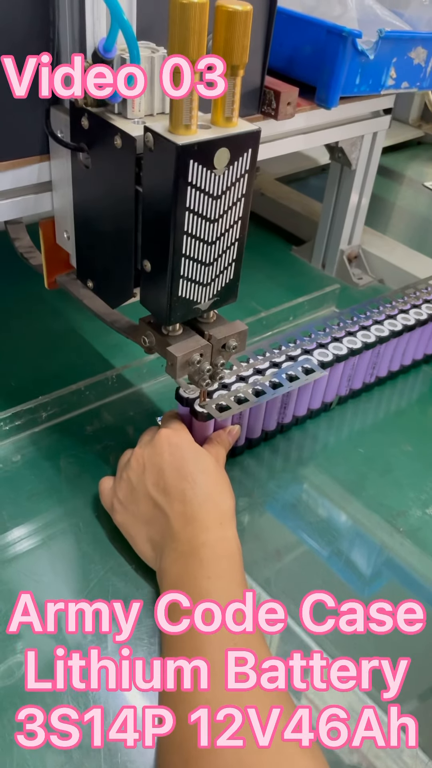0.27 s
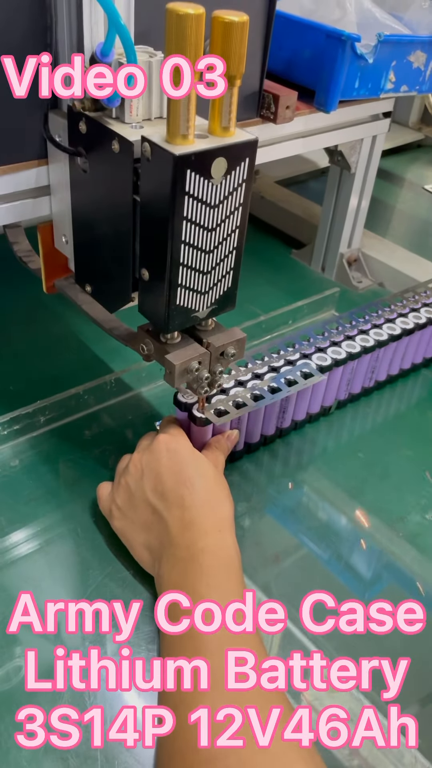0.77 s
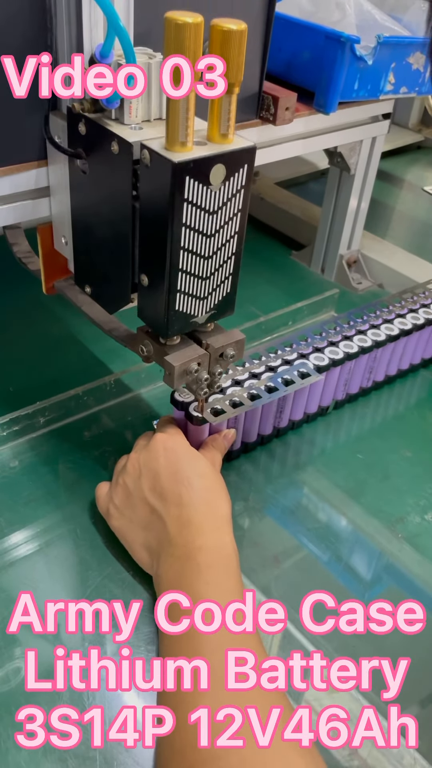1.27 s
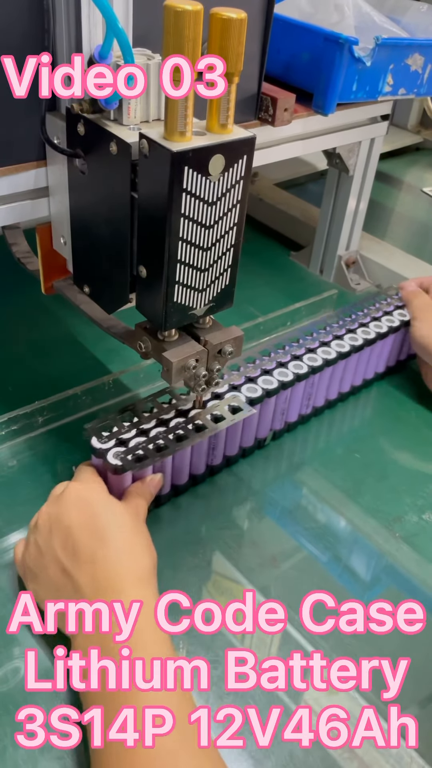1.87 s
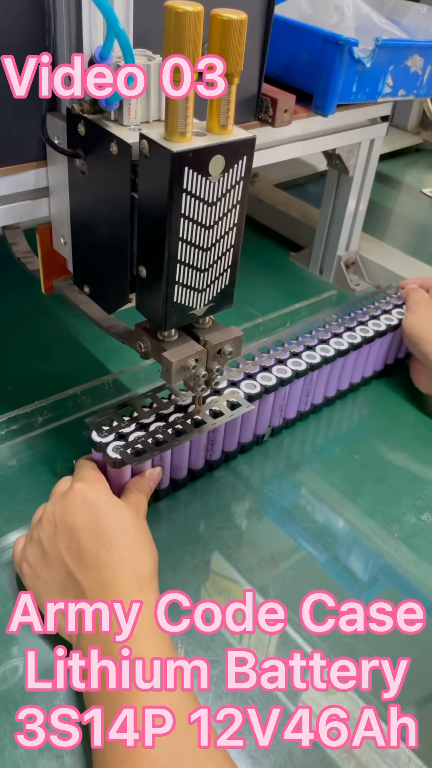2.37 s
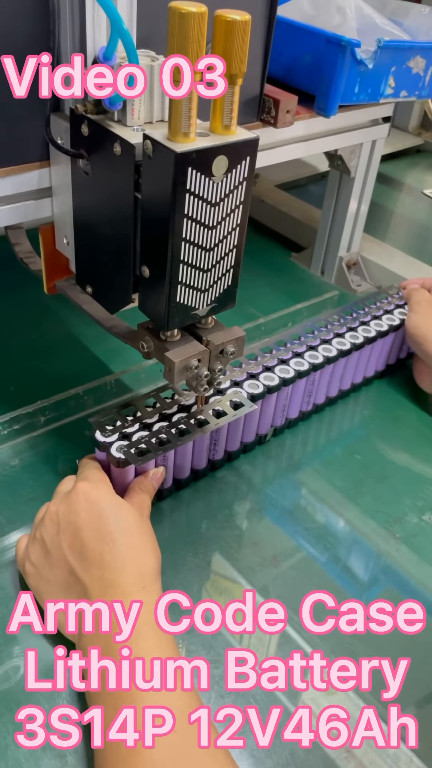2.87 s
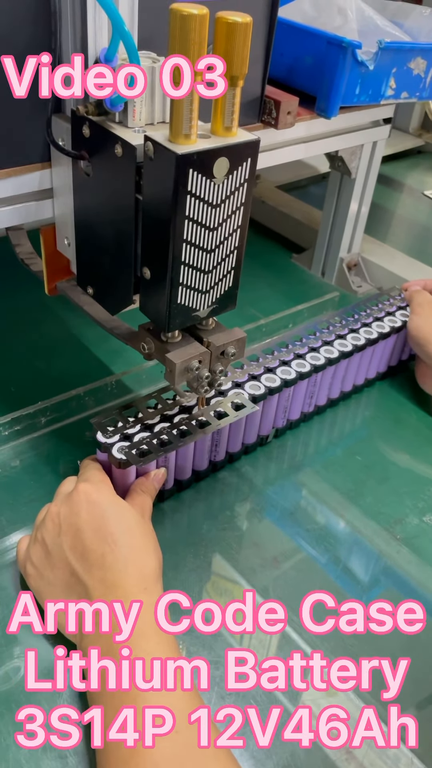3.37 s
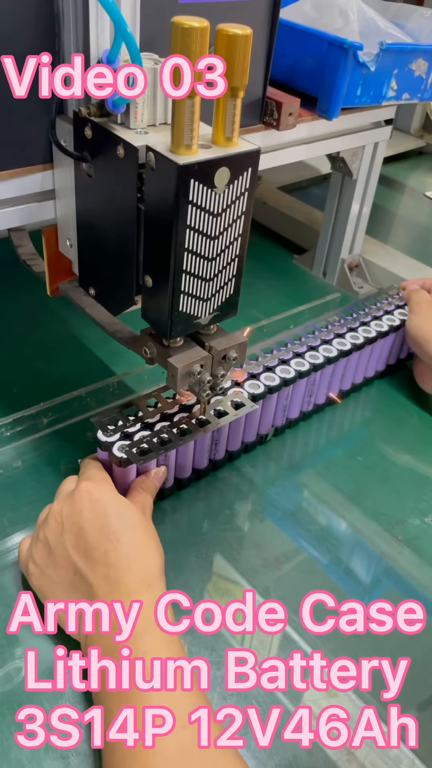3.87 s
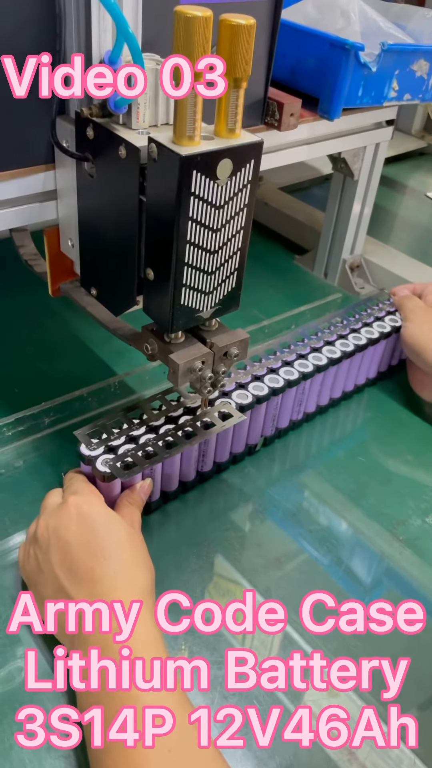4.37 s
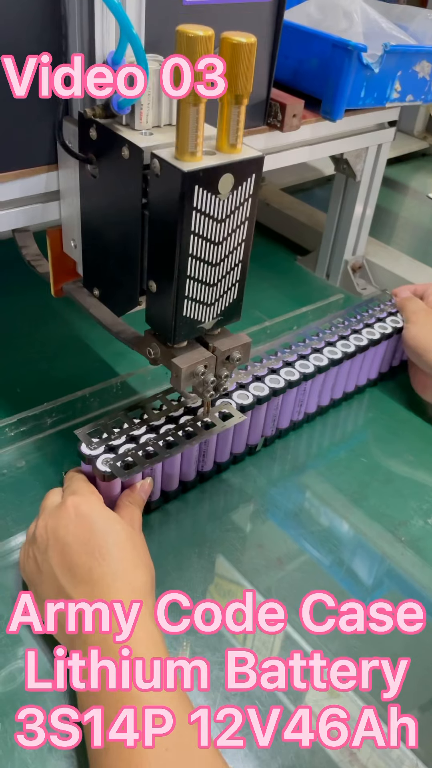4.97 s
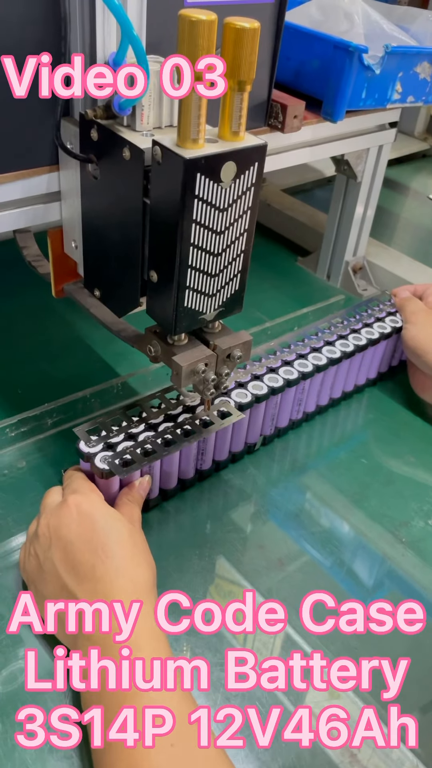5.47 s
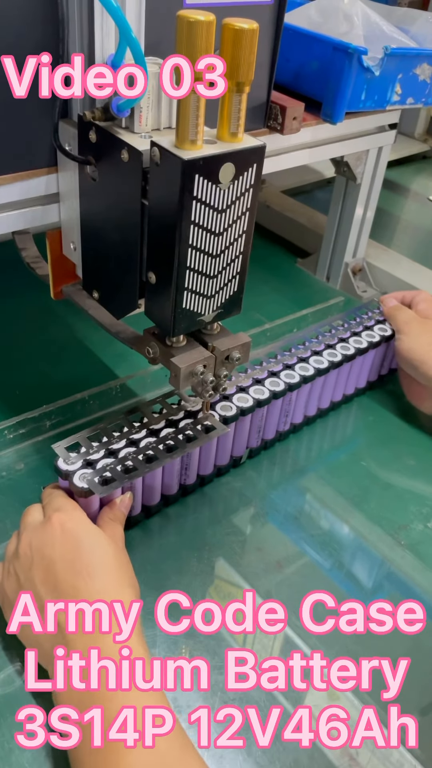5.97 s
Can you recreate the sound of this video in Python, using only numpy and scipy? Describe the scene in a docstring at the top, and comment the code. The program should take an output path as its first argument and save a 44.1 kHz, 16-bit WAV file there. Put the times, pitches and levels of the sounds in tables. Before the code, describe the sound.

Three pairs of sharp air spits and metal clacks come from a close spot welder, with machines humming behind.

```python
"""A workshop bench: a pneumatic spot welder works close to a phone. Each weld is one cycle: the valve
spits air, the head slams onto the cells, the valve vents, the piston clacks home and the frame shudders.
Air is fluttering noise; blows are chattering contacts that ring metal modes. Between welds the pack
of cells slides and bumps along the bench; machines drone and air lines hiss behind."""
import sys
import numpy as np
from scipy import signal
from scipy.fft import rfft, irfft, next_fast_len
from scipy.io import wavfile
from scipy.ndimage import uniform_filter1d

SR = 44100
rng = np.random.default_rng(int(sys.argv[2]) if len(sys.argv) > 2 else 0)


def unload_audio(sound):
    """Save the sound as a 16-bit wav file, at the path given as the first command line argument."""
    columns = np.transpose(np.atleast_2d(sound))
    # keep every value between -1 and 1, then stretch to whole-number steps
    steps = np.round(np.clip(columns, -1, 1) * 32767)
    wavfile.write(sys.argv[1], SR, steps.astype(np.int16))


N = 274743

# valve opens to drive the head down: t/s, air/dB, burst t60/s, knock/dB
FEEDS = [(0.5014, -7, 0.033, -14.5), (1.1217, -8, 0.042, -17), (2.974, -7.5, 0.041, -15.5),
         (3.615, -8, 0.038, -15.5), (4.796, -8.5, 0.037, -15.5), (5.3956, -9, 0.05, -15.5)]
# piston hits the end cap: t/s, level/dB
CLACKS = [(0.72, -16.5), (1.347, -18), (3.206, -15), (3.849, -19), (5.019, -16.5), (5.606, -17)]
# head rebounds, frame shudders: t/s, level/dB, treble/dB, shudder t/s, shudder level/dB
REBOUNDS = [(.768, -19, -4, .797, -10), (1.401, -19.5, 1, 1.415, -8), (3.259, -18, 1, 3.281, -11.5),
            (3.900, -20.5, 0, 3.916, -12), (5.069, -19.5, 1.5, 5.095, -6), (5.659, -20, 1, 5.689, -8.5)]
# welder frame: f/Hz, level/dB, t60/s
FRAME_MODES = [(62, -18, 0.067), (77.7, -4, 0.098), (118.9, 0, 0.049), (142.2, -10, 0.059),
               (148.4, -2, 0.068), (207.6, -5, 0.084), (246.1, -5.5, 0.11), (266.7, -8, 0.12),
               (309.6, -10, 0.067), (381.6, -5.5, 0.031), (518.6, -1.5, 0.036), (607, -6.5, 0.026),
               (659, -14.5, 0.059), (826, -16.5, 0.036), (978, -12, 0.035), (1107, -7.5, 0.031),
               (1428, -7.5, 0.016), (1483, -21.5, 0.069), (1616, -7.5, 0.017), (1823, -12.5, 0.027),
               (2030, -19, 0.023), (2200, -26, 0.027), (2313, -14.5, 0.021), (2780, -9.5, 0.015),
               (2990, -10.5, 0.012), (3260, -18, 0.019), (3870, -11, .009)]
# coupling of clacks and ticks to their modes: f/Hz, gain/dB
CAP_REACH = [(990, -1), (1600, -5.5), (2400, -1), (3400, -4), (4700, 2)]


def valve_air():
    """Air spits as the valve feeds and vents and the piston lands; faint spits of treble between welds."""
    vents = [(0.644, -21.5, 0.012, -11), (1.2676, -17, 0.011, -18), (3.128, -19, 0.019, -16.5),
             (3.765, -18.5, 0.015, -18), (4.94, -20.5, 0.016, -14), (5.529, -23, 0.0077, -10)]  # exhaust: t/s, level/dB, rise/s, hiss re burst/dB
    spits = [(0.871, -39, -17), (1.589, -42.5, -6), (2.0598, -37.5, -35), (2.1403, -32, -18.5),
             (2.1944, -42, -16), (3.961, -47.5, 0.5), (4.3014, -54, 1.5), (5.7538, -43, -10.5)]  # faint spits of treble: t/s, level/dB, hiss re burst/dB
    feed = jet([(s, db, 0.0025, t60, -20) for s, db, t60, _ in FEEDS])
    cylinder_fill = jet([(s, db - 13.5, 0.0025, 0.1, -30) for s, db, *_ in FEEDS])
    vent = jet([(s, db, rise, 0.09, hiss_db) for s, db, rise, hiss_db in vents])
    treble_spits = jet([(s, db, 0.002, 0.03, hiss_db) for s, db, hiss_db in spits])
    squeezed_out = jet([(s, db - 14, 0.002, 0.035, -30) for s, db in CLACKS])
    return feed + cylinder_fill + vent + treble_spits + squeezed_out


def jet(events):
    """A jet snaps open, collapses fast and leaves a thin hiss; turbulence makes it flutter."""
    burst_spectrum = [(300, -32), (1200, -0.5), (2000, -4), (2600, 2.5), (3300, -11), (4200, -1.5),
                      (5300, 3.5), (6300, 4.5), (7500, 5), (9800, -3), (11500, -1.5), (13500, -6),
                      (15300, -4.5), (16500, -7)]  # open jet: f/Hz, density/dB
    hiss_spectrum = [(600, -3), (1500, 0.5), (2600, -0.5), (4200, -3.5), (5200, 4), (6000, 1.5),
                     (8500, -5.5), (10500, -5), (12600, -10.5), (13600, -11), (15500, -21), (16500, -32)]  # lingering hiss: f/Hz, density/dB
    hiss_t60_s = 0.42
    burst, hiss, t = np.zeros(N), np.zeros(N), np.arange(SR) / SR
    snap = 0.54 * np.exp(-t / 0.00067)
    for s, db, rise_s, t60_s, hiss_db in events:
        opening = undb(db) * (1 - np.exp(-t / rise_s))
        add(burst, s, opening * (undb(-60 * t / t60_s) + snap))
        add(hiss, s, opening * undb(hiss_db - 60 * t / hiss_t60_s))
    flutter = undb(2.0 * walk(300) + 2.2 * walk(45))
    return flutter * (burst * noise(burst_spectrum) + hiss * noise(hiss_spectrum))


def head_slams():
    """The head lands on the cells and rings the frame."""
    slams = [(.568, -20, 12, 9.5), (1.182, -20.5, 13, 6), (3.043, -20.5, 10, 9.5), (3.673, -20, 10, 14.5),
             (4.859, -21.5, 12, 13), (5.455, -22, 15, 16.5)]  # landings: t/s, level/dB, bass/dB, middle/dB
    reach = [(61, -8), (80, -3.5), (116, -2.5), (137, 8), (153, 2), (208, 1.5), (250, 0.5), (400, 1),
             (510, 3), (610, -1), (1100, 3), (1390, -2.5), (1470, 11.5), (1610, -1), (3000, 3.5), (3800, 1)]  # coupling to the frame: f/Hz, gain/dB
    hits = [blow(*slam, treble_db=5.5, rattle_s=0.0086) for slam in slams]
    return struck(hits, FRAME_MODES, reach, scatter_db=2.5, lag_s=0.0418, first_hz=772,
                  rise_s=0.00045, detune=0.022, push=10)


def head_release():
    """The head lets go in a few jerks, each ringing the frame."""
    jerks = [(.654, -16.5, -2, 0), (.660, -15, 0, -1.5), (.673, -16.5, 0, 0), (.682, -21, 5, 2),
             (1.277, -16.5, 10.5, 4), (1.286, -16, -9, -1), (1.303, -25.5, 4, 2), (3.138, -17, 5, 0.5),
             (3.145, -13, -6, -2), (3.158, -23.5, 1, 1.5), (3.769, -13.5, 0, 4), (3.776, -13, 2, -3),
             (3.784, -14.5, -5, -2), (4.952, -19, -3, 3), (4.958, -13.5, -6, 0), (4.973, -18, 5, -2),
             (4.981, -20, 1, -4), (5.540, -15.5, -5, -1), (5.545, -11, 0, -4), (5.555, -22, -3, -4),
             (5.566, -21, 7, 3)]  # release: t/s, level/dB, middle/dB, treble/dB
    reach = [(61, 1), (116, 6), (150, -12), (208, 5.5), (250, -2.5), (400, -2), (510, -4.5), (700, 4),
             (1100, 5.5), (1470, 2.5), (2000, 9), (3000, 6.5), (3800, 13)]  # coupling to the frame: f/Hz, gain/dB
    hits = [blow(s, db, -6.5, middle, treble, rattle_s=0.0049) for s, db, middle, treble in jerks]
    return struck(hits, FRAME_MODES, reach, scatter_db=2.5, lag_s=0.0032, first_hz=2500,
                  rise_s=0.0029, detune=0.021, push=9.8)


def frame_shudder():
    """A long, low chatter of the frame after each rebound."""
    reach = [(61, -24), (80, -27), (120, -11), (153, -4), (208, -8), (250, -1.5), (316, -9), (600, -19),
             (2200, -34)]  # coupling to the frame: f/Hz, gain/dB
    hits = [blow(s, db, rattle_s=0.02) for *_, s, db in REBOUNDS]
    return struck(hits, FRAME_MODES, reach, scatter_db=1, lag_s=0.0055, first_hz=2980,
                  rise_s=0.0049, detune=0.0078, push=2.3)


def piston_clacks():
    """The returning piston rings the end cap."""
    cap_modes = [(998, -0.5, 0.042), (1185, -12, 0.076), (1244, 3, 0.0041), (1446, 7, 0.024),
                 (1515, 7, 0.023), (1598, 4.5, 0.016), (1750, -3, 0.029), (2010, -2, 0.008),
                 (2260, -14, 0.0091), (2417, -3.5, 0.03), (2690, -0.5, 0.01), (2966, 1.5, 0.021),
                 (3128, 7.5, 0.0086), (3430, 2, 0.019), (4500, -5, 0.0079)]  # end cap: f/Hz, level/dB, t60/s
    hits = [blow(s, db, rattle_s=0.0046) for s, db in CLACKS]
    return struck(hits, cap_modes, CAP_REACH, scatter_db=1.5, lag_s=0.109, first_hz=2405,
                  rise_s=0.00078, detune=0.019, push=22, high_lag=1.6)


def cylinder_chirps():
    """Each clack runs through the cylinder, treble first: a short ring falling in pitch."""
    from_hz, to_hz, glide_s, peak_s = 2667, 1140, 0.00291, 0.0027
    out, t = np.zeros(N), np.arange(2000) / SR
    hz = to_hz + (from_hz - to_hz) * np.exp(-t / glide_s)
    envelope = (t / peak_s * np.exp(1 - t / peak_s)) ** 2
    ring = envelope * np.sin(2 * np.pi * np.cumsum(hz) / SR)
    for s, db in CLACKS:
        add(out, s, undb(db + 1) * ring)
    return out


def light_knocks():
    """Valve knocks, spool ticks, piston bounces, head rebounds and bench bumps ring the frame."""
    bumps = [(1.094, -34, 2, 4), (1.649, -25, 5, -13), (1.713, -28, 1, -3), (2.168, -23, -8, -13),
             (2.195, -24.5, -19, -4), (2.400, -34.5, 16, -11), (2.415, -31.5, 14, -8), (3.398, -31, 3, -27),
             (5.280, -26, -12, 2)]  # on the bench between welds: t/s, level/dB, bass/dB, middle/dB
    reach = [(60, -0.5), (250, 0), (1000, 1.5), (2300, -5.5), (3000, -0.5), (3760, -5)]  # coupling to the frame: f/Hz, gain/dB
    knocks = [blow(s + 0.00602, db, -7, -0.5, -45) for s, *_, db in FEEDS]
    ticks = [blow(s + 0.016, -31.5, -4, 3.5, 21) for s, *_ in FEEDS]
    bounces = [blow(s + 0.016, db - 5, -0.5, 2, -1.5) for s, db in CLACKS]
    rebounds = [blow(s + after_s, db + contact_db, -6, 2, treble, rattle_s=0.005)
                for s, db, treble, *_ in REBOUNDS for after_s, contact_db in ((0, -3), (0.013, -4))]
    bench = [blow(*bump, treble_db=-1.5, rattle_s=0.0075) for bump in bumps]
    hits = knocks + ticks + bounces + rebounds + bench
    return struck(hits, FRAME_MODES, reach, scatter_db=0.5, lag_s=0.0079, first_hz=3070,
                  rise_s=0.00086, detune=0.025, push=9.4)


def valve_spool():
    """The spool rings the valve body as it opens and again as it seats."""
    body_modes = [(2583, 1, 0.05), (3720, -3.5, 0.045), (4920, -11, 0.036), (5160, -9, .05),
                  (5800, -2, 0.042), (6370, -18, 0.036)]  # valve body: f/Hz, level/dB, t60/s
    reach = [(2600, 0.46), (5000, -0.62), (10000, -2)]  # f/Hz, gain/dB
    hits = [blow(s + after_s, db - 15.5, treble_db=treble, rattle_s=0.006)
            for s, db, *_ in FEEDS for after_s, treble in ((0, 0), (0.016, -5))]
    return struck(hits, body_modes, reach, scatter_db=4, rise_s=0.0008, detune=0.013, push=6.7)


def loose_metal():
    """Loose metal in the head ticks brightly."""
    ticks = [(0.686, -26), (.769, -31), (.783, -25), (1.096, -35), (1.400, -26), (3.270, -22), (5.070, -27),
             (5.082, -25), (5.657, -30), (5.671, -19.5)]  # contacts: t/s, level/dB
    modes = [(2820, -16, 0.011), (3180, -3, 0.014), (1500, -1, .012)]  # loose parts: f/Hz, level/dB, t60/s
    hits = [blow(s, db) for s, db in ticks]
    return struck(hits, modes, CAP_REACH, scatter_db=0.5, rise_s=0.0005, detune=0.014, push=6.7)


def blow(s, db, bass_db=0, middle_db=0, treble_db=0, rattle_s=0.001):
    """One hit for struck(): time, level, tone curve and chatter decay."""
    return s, db, [(120, bass_db), (230, 0), (600, middle_db), (2200, treble_db)], rattle_s


def struck(hits, modes, reach, scatter_db, rise_s, detune, push, lag_s=0, first_hz=3000, high_lag=0):
    """Chattering contacts ring the modes; those below first_hz lag, those above too if high_lag."""
    out, t = np.zeros(N), np.arange(12000) / SR
    hz, mode_db, t60_s = np.array(modes, float).T[:, :, None]
    log_distance = np.maximum(np.log(first_hz / hz), high_lag * np.log(hz / first_hz))
    delay_s = lag_s * (log_distance / 4.12) ** 2.1  # lag_s about six octaves down
    age_s = np.maximum(t - delay_s, 0)
    envelope = (1 - np.exp(-age_s / rise_s)) * undb(-60 * age_s / t60_s)
    for s, db, tone, rattle_s in hits:
        level_draw, pitch_draw = rng.standard_normal((2, len(modes), 1))
        rings = envelope * np.sin(2 * np.pi * hz * (1 + detune * pitch_draw) * age_s)
        chatter = rng.standard_normal((len(modes), 2048)) ** 3 * np.exp(-t[:2048] / rattle_s)
        chatter[:, :1] += push + 3000 / hz  # slow modes feel mostly the first push
        rung = signal.fftconvolve(rings, chatter, axes=1)
        rung *= np.sqrt(np.sum(rings ** 2, axis=1) / np.sum(rung ** 2, axis=1))[:, None]  # same energy
        gain = undb(mode_db + at_hz(reach, hz) + scatter_db * level_draw + at_hz(tone, hz))
        add(out, s, undb(db) * np.sum(gain * rung, axis=0))
    return out


def pack_scrapes():
    """The pack rubs unevenly on the bench, fading in and out."""
    slides = [(3.967, 0.091, -43.5), (4.044, 0.092, -45.5), (4.299, 0.13, -50.5)]  # pack moves: t/s, length/s, level/dB
    spectrum = [(800, -25), (1500, -7), (2000, -5), (2700, -9.5), (4000, -15), (9000, -25), (12000, -70)]  # friction: f/Hz, density/dB
    t = np.arange(N) / SR
    drag = sum(undb(db) * np.interp(t, s + length_s * np.array([0, 0.13, 0.68, 1]), [0, 1, 1, 0])
               for s, length_s, db in slides)
    return drag * undb(4.1 * walk(60)) * noise(spectrum)


def thin_hiss():
    """Very high hisses between welds start at once and fade."""
    hisses = [(.871, -52, 0.46), (1.59, -56, 0.74), (2.194, -47, .35)]  # onsets: t/s, level/dB, t60/s
    spectrum = [(11000, -28), (13500, -6), (14600, 0), (15600, 2), (16500, -10)]  # hiss: f/Hz, density/dB
    envelope, t = np.zeros(N), np.arange(SR) / SR
    for s, db, t60_s in hisses:
        add(envelope, s, undb(db - 60 * t / t60_s))
    return envelope * noise(spectrum)


def workshop():
    """Machines drone and air lines hiss; the bench booms and the hiss swells with each weld."""
    levels = [(0.0, -33, -45.5), (0.54, -34.5, -44.5), (1.16, -34, -44.5), (1.47, -31.5, -43.5),
              (1.82, -35, -45.5), (2.33, -31, -46), (2.64, -34.5, -45), (2.98, -33.5, -44),
              (3.64, -34, -44), (4.09, -32.5, -43.5), (4.44, -35.5, -45), (4.72, -34.5, -45.5),
              (5.36, -31.5, -44), (6.23, -34.5, -46.5)]  # background: t/s, rumble/dB, hiss/dB
    shake_spectrum = [(30, -27), (60, -9), (120, 7), (170, -8.5), (240, 2.5), (350, -9.5), (600, -13),
                      (1000, -16.5), (1600, -39), (4000, -92)]  # bench: f/Hz, density/dB
    rumble_spectrum = [(25, 1.5), (40, 4), (58, 6.5), (110, 0.5), (160, -3.5), (230, 1.5), (330, -8.5),
                       (520, -13), (750, -19), (1000, -17), (1500, -51), (2500, -51.5)]  # machines: f/Hz, density/dB
    hiss_spectrum = [(600, 10), (1200, 5.5), (2000, 2.5), (3000, -0.5), (4500, -8.5), (7000, -12.5),
                     (10000, -19.5), (12600, -27), (13600, -70), (16400, -90)]  # air lines: f/Hz, density/dB
    s, rumble_db, hiss_db = np.transpose(levels)
    t = np.arange(N) / SR
    shake = undb(-29.5) * swell(t, build_s=0.3, fade_s=0.19) * noise(shake_spectrum)
    rattle_db = 4 * swell(t, build_s=0.24, fade_s=0.12)
    rumble = undb(np.interp(t, s, rumble_db) + 2.1 * walk(15)) * noise(rumble_spectrum)
    hiss = undb(np.interp(t, s, hiss_db) + rattle_db) * noise(hiss_spectrum)
    return rumble + shake + hiss


def room(x):
    """Diffuse echo, duller than the direct sound."""
    t60_s, echo_db, cutoff_hz = 0.26, -23, 3080
    t = np.arange(SR) / SR
    tail = rng.standard_normal(SR) * undb(-60 * t / t60_s) * (1 - np.exp(-t / 0.00089))
    tail = signal.lfilter(*signal.butter(1, cutoff_hz, fs=SR), tail)
    return undb(echo_db) * signal.fftconvolve(x, tail / np.linalg.norm(tail))[:N]


def swell(t, build_s, fade_s):
    """Ramps from 0 to 1 at each rebound and back."""
    return sum(np.interp(t, [s - build_s, s, s + fade_s], [0, 1, 0]) for s, *_ in REBOUNDS)


def undb(db):
    return 10 ** (np.asarray(db) / 20)


def at_hz(table, hz):
    """Reads (f/Hz, value) points on a log-frequency axis."""
    f, v = np.transpose(table)
    return np.interp(np.log(hz + 1), np.log(f + 1), v)


def coloured(x, spectrum):
    """Filters x by (f/Hz, gain/dB) points."""
    size = next_fast_len(len(x))
    gain = undb(at_hz(spectrum, np.fft.rfftfreq(size, 1 / SR)))
    return irfft(rfft(x, size) * gain, size)[:len(x)]


def noise(spectrum):
    """Coloured noise, rms 1."""
    x = coloured(rng.standard_normal(N), spectrum)
    return x / np.std(x)


def walk(rate_hz):
    """Slewed random levels, spread near 0.5."""
    step = int(SR / rate_hz)
    return 0.58 * uniform_filter1d(np.repeat(rng.standard_normal(N // step + 1), step), step)[:N]


def add(out, s, sound):
    """Mixes a sound in at time s."""
    i = int(s * SR)
    out[i:i + len(sound)] += sound[:N - i]


def scene():
    """Welder, echo and workshop in stereo."""
    stereo_width = [(60, -48), (150, -47), (350, -18), (700, -8), (1300, -6), (2000, -6), (2800, -2),
                    (4600, 1), (5500, -3), (6500, -6), (7500, -22), (9200, -2), (10800, -25), (12700, 0),
                    (14000, -20), (15300, -6), (16200, 0)]  # width by frequency: f/Hz, side gain/dB
    direct = valve_air() + valve_spool() + pack_scrapes() + thin_hiss()
    direct += head_slams() + head_release() + frame_shudder()
    direct += piston_clacks() + cylinder_chirps() + loose_metal() + light_knocks()
    # wide in the treble, with narrow centred bands near 7.5, 11 and 14 kHz
    side = coloured(undb(4) * room(direct) + workshop() + undb(-6) * valve_air(), stereo_width)
    return direct + room(direct) + workshop() + np.array([side, -side])


def record(dry):
    """Two close ports differ in level and phase; the phone cuts deep bass and the top."""
    balance = [(60, 0.0), (200, 0.0), (380, 0.69), (700, 2.4), (1290, 1.0), (2380, -0.6), (4400, 0.31),
               (8120, 0.2), (15000, 0.0)]  # port levels: f/Hz, left minus right/dB
    phase = [(0, 0), (2000, .1), (3000, 1.1), (4500, 1.4), (5000, 0), (6000, 1.5), (7000, 3), (7800, 3.2),
             (9000, 4.1), (10000, 6), (11500, 6.4), (12500, 7.6), (13400, 9.3), (14600, 9.5), (15300, 10.3),
             (17000, 10)]  # port phases: f/Hz, left lead/rad
    bass_cut_hz, top_hz = 42, 16000
    size = next_fast_len(N + SR)
    hz, side = np.fft.rfftfreq(size, 1 / SR), np.array([[.5], [-.5]])
    ports = undb(side * at_hz(balance, hz)) * np.exp(1j * side * at_hz(phase, hz))
    stereo = irfft(rfft(dry, size) * ports, size)[:, :N]
    stereo = signal.sosfilt(signal.butter(4, bass_cut_hz, "high", fs=SR, output="sos"), stereo)
    return signal.sosfilt(signal.ellip(10, .2, 80, top_hz, fs=SR, output="sos"), stereo)


dry = scene()
out = record(dry)
unload_audio(out)
```